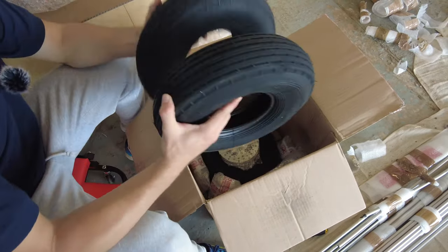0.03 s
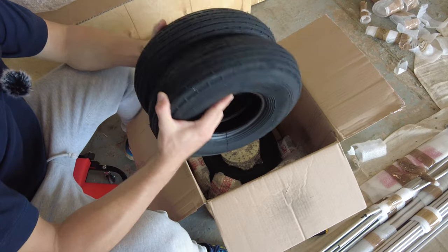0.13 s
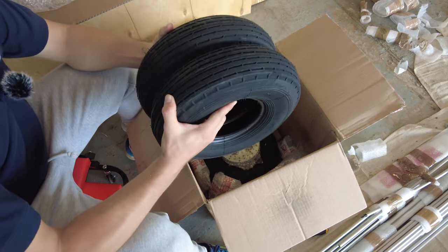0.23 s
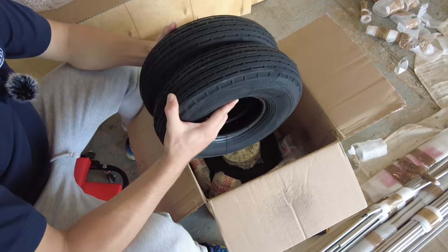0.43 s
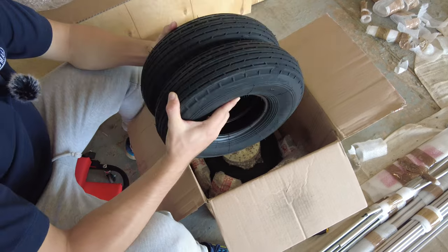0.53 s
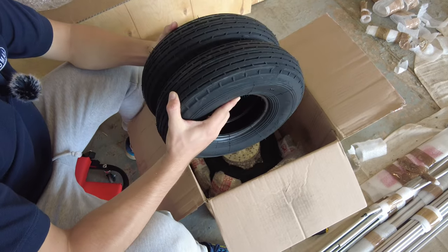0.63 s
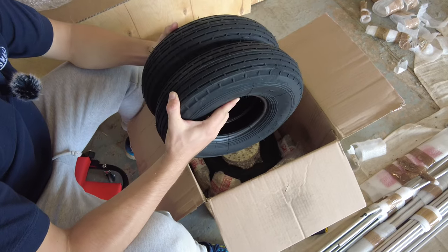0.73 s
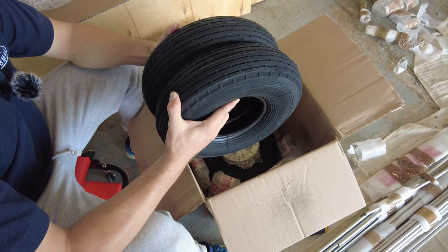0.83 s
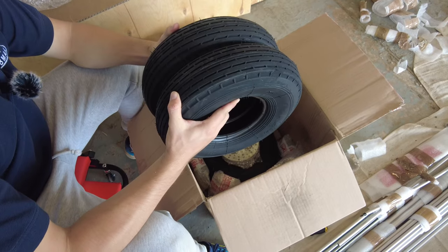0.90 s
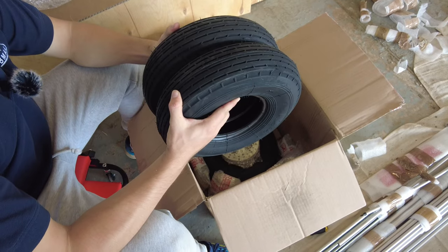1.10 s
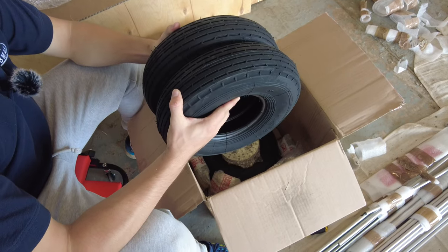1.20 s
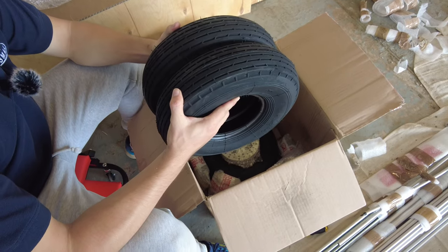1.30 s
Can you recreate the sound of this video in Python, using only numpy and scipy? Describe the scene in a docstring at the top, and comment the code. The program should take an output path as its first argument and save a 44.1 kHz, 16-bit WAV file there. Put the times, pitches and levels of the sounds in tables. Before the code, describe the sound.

One hollow thump of a tyre bumping a cardboard box, then faint ticks, indoors.

```python
"""A low hum and the hiss of air fill a small room. With a faint tick, a rubber tyre is lifted out of a
cardboard box. It grazes a flap, then scuffs and knocks the wall: the impact excites the modes of the
box and of the air in the tyre, a hollow thump. It nudges the box again. At each contact the card
crackles and the wall flexes, and the room rings briefly. A few faint ticks follow as the tyre is held."""
import sys
import numpy as np
from scipy import signal
from scipy.fft import rfft, irfft, next_fast_len
from scipy.io import wavfile
from scipy.ndimage import map_coordinates

SR = 44100
rng = np.random.default_rng(int(sys.argv[2]) if len(sys.argv) > 2 else 0)


def unload_audio(sound):
    """Save the sound as a 16-bit wav file, at the path given as the first command line argument."""
    columns = np.transpose(np.atleast_2d(sound))
    # keep every value between -1 and 1, then stretch to whole-number steps
    steps = np.round(np.clip(columns, -1, 1) * 32767)
    wavfile.write(sys.argv[1], SR, steps.astype(np.int16))


N = 59535

# Spectrum of the bright noise in ticks and slides. Each row: frequency in Hz, level in dB.
BRIGHT_SPECTRUM = [(500, -24), (1700, -7), (2700, 6), (4000, -5), (8000, -3), (11000, -6), (15000, -14.5)]


def amp(db):
    """Decibels to amplitude ratio."""
    return 10 ** (np.asarray(db) / 20)


def unit(x):
    """Normalise to rms 1."""
    return x / np.sqrt(np.mean(x ** 2) + 1e-20)


def along(points, hz):
    """Interpolate (Hz, value) points on a logarithmic frequency axis."""
    freqs, values = np.transpose(points)
    return np.interp(np.log(hz + 1), np.log(freqs + 1), values)


def filtered(x, response):
    """Linear filtering: multiply the spectrum by a frequency response."""
    size = next_fast_len(len(x) + SR // 2)
    return irfft(rfft(x, size) * response(np.fft.rfftfreq(size, 1 / SR)), size)[:len(x)]


def noise(spectrum):
    """White noise shaped to a (Hz, dB) spectrum, at rms 1."""
    return unit(filtered(rng.standard_normal(N), lambda hz: amp(along(spectrum, hz))))


def wobble(rate):
    """A smooth random curve with rate knots a second."""
    return map_coordinates(rng.standard_normal(int(N * rate / SR) + 4), [np.arange(N) * rate / SR])


def since(start):
    """Seconds since start, zero before it."""
    return np.maximum(np.arange(N) / SR - start, 0)


def fade(start, t60, attack):
    """A quick rise and an exponential decay of 60 dB in t60 seconds."""
    t = since(start)
    return (1 - np.exp(-t / attack)) * np.exp(-np.log(1000) * t / t60)


def ring(start, hz, t60, attack):
    """Free vibration of one struck mode: a damped sinusoid."""
    return np.sin(2 * np.pi * hz * since(start)) * fade(start, t60, attack)


def hum_and_air(hum_hz=78.6, waver_db=0.44):
    """Superposition: two harmonics of a hum trade strength over the broadband noise of the room's air."""
    # Each row: time in seconds, level of the fundamental in dB, level of the octave in dB.
    hum_levels = [(.1, -60, -75), (0.402, -66.5, -67), (.6, -65.5, -68.5), (1.3, -66, -67)]
    # Each row: frequency in Hz, relative spectral density in dB.
    air_spectrum = [(20, -0.5), (30, 6), (55, -5.5), (110, -15.5), (200, -22.5), (450, -28.5), (900, -26),
                    (1800, -35), (4000, -40), (8000, -44.5), (12000, -49), (14000, -60.5)]
    t = since(0)
    times, *harmonic_levels = np.transpose(hum_levels)
    out = amp(-62.5) * noise(air_spectrum)
    for harmonic, db in enumerate(harmonic_levels, 1):
        rms = amp(np.interp(t, times, db) + waver_db * wobble(5))
        out += np.sqrt(2) * rms * np.sin(2 * np.pi * (harmonic * hum_hz * t + rng.random()))
    return out


def ticks(t60=0.0081, lower_ratio=0.84):
    """Damped resonance: each small creak of card and rubber rings two modes under a bright snap."""
    # Each row: start in seconds, ring level in dB, resonance in Hz, snap level in dB, rise in seconds.
    creaks = [(.041, -50, 2700, -62.5, 0.0023), (.126, -52.5, 1308, -88.5, .001),
              (.391, -45.5, 2820, -64.5, 0.00082), (0.575, -82, 3880, -56, 0.00083),
              (.5797, -46.5, 2950, -51, 0.00019), (.776, -78.5, 2966, -67.5, 0.00047),
              (0.807, -59.5, 2560, -67, 0.00091), (0.954, -44, 1240, -88, 0.0012),
              (.973, -67, 4500, -65.5, 0.00058), (1.2463, -49.5, 2706, -59, 0.00046),
              (1.2575, -53.5, 2680, -61.5, 0.00033)]
    out = np.zeros(N)
    for start, db, hz, snap_db, rise in creaks:
        modes = ring(start, hz, t60, rise) - amp(-6) * ring(start, hz * lower_ratio, t60, rise)
        snap = noise(BRIGHT_SPECTRUM) * fade(start, t60=0.013, attack=rise)
        out += amp(db) * modes + amp(snap_db) * snap
    return out


def reverberation(x, build_s=0.0027):
    """Convolution with a diffuse tail: the room's reflections die at a rate set by frequency."""
    # Each row: frequency in Hz, reverberation time in seconds.
    decay_times = [(60, 0.57), (250, 0.86), (550, .65), (2700, 0.6), (6000, .42), (12000, 0.43)]
    # Each row: frequency in Hz, gain of the tail in dB.
    colour = [(40, -5.5), (90, 1), (170, -2.5), (270, -14), (420, -2.5), (600, -3.5), (900, -9),
              (1400, 5.5), (2700, -1), (5000, 0.5), (12000, 1.5)]
    hz, t, spectra = signal.stft(rng.standard_normal(SR), SR, nperseg=256)
    decay = np.exp(-np.log(1000) * t / along(decay_times, hz)[:, None])
    _, tail = signal.istft(spectra * decay, SR, nperseg=256)
    tail = filtered(tail / np.linalg.norm(tail), lambda f: amp(along(colour, f)))
    tail *= 1 - np.exp(-np.arange(len(tail)) / SR / build_s)
    return amp(-11.5) * signal.fftconvolve(x, tail)[:N]


def knocks(wall_hz=96, wall_lag_s=0.0021, pat_lag_s=0.0028, pat_width_s=0.00089):
    """Impacts excite the modes of the box and the tyre's air; rubber that stays in touch damps them."""
    # Each row: start in seconds, thump level in dB, softness cut-off in Hz, share of the free ring
    # time, crack level in dB, wall push in dB, pat level in dB.
    contacts = [(0.123, -56, 2370, 0.83, -72, -59.5, -43), (0.1805, -26.5, 901, 0.44, -31.5, -31, -20.5),
                (0.2076, -8, 1500, 0.89, -36.5, -24, -43.5), (0.314, -32.5, 290, 0.87, -82, -49, -48),
                (0.36, -29.5, 540, 0.78, -51, -35, -50.5), (0.386, -48, 505, 0.66, -72, -42.5, -82),
                (.452, -47, 316, 1, -80, -72, -77)]
    # Modes of the box and of the air inside the tyre.
    # Each row: frequency in Hz, relative level in dB, free 60 dB decay time in seconds.
    box_modes = [(200.9, -22, 0.02), (257.8, 0.5, .07), (314.4, -3, 0.086), (427, -12.5, .035),
                 (564.5, -19.5, .085), (657, -29, 0.044), (722, -5, 0.011), (782, -26.5, .05),
                 (970, -28, 0.01), (1299, -38, .09), (2304, -45.5, .06)]
    cavity_modes = [(262.7, -31.5, 0.6), (302.5, -39.5, .6), (391.8, -37, .3), (623, -36.5, 0.32)]
    # Each entry: the direction in which a box mode first swings.
    polarities = [1, 1, -1, 1, -1, -1, 1, 1, 1, -1, 1]
    # The cardboard's crack. Each row: frequency in Hz, level in dB.
    crack_spectrum = [(100, -18.5), (750, -14), (1050, -5.5), (1400, 5), (1850, -6), (2650, 5.5),
                      (3800, -13.5), (6500, -11.5), (9500, -19.5), (12000, -37), (15000, -42.5)]
    out = np.zeros(N)
    for start, db, soft_hz, free, crack_db, push_db, pat_db in contacts:
        # A softer contact drives high modes less and cracks with a slower rise.
        drive = lambda hz: amp(db) / np.sqrt(1 + (hz / soft_hz) ** 4)
        for sign, (hz, mode_db, t60) in zip(polarities, box_modes):
            out += sign * amp(mode_db) * drive(hz) * ring(start, hz, t60 * free, attack=0.00045)
        for hz, mode_db, t60 in cavity_modes:
            out += free * amp(mode_db) * drive(hz) * ring(start, hz, t60, attack=0.01)
        out += amp(crack_db) * noise(crack_spectrum) * fade(start, t60=0.011, attack=0.4 / soft_hz)
        # Rubber lands flat on the card: one rounded pulse of pressure.
        out += amp(pat_db) * np.exp(-((since(0) - start - pat_lag_s) / pat_width_s) ** 2)
        # The whole wall bulges.
        out += amp(push_db) * ring(start + wall_lag_s, wall_hz, t60=0.09 * free, attack=0.003)
    return out


def rubbing(grain_hz=903, rough_db=5, release_t60=0.019):
    """Friction noise: rubber slides softly on the card and catches in grainy bursts at the main knock."""
    # Each row: start in seconds, level in dB, hold in seconds.
    scuffs = [(0.2011, -35, 0.00034), (0.2033, -41, 0.00087), (0.2103, -41.5, 0.0089)]
    # Each row: frequency in Hz, level in dB.
    scuff_spectrum = [(200, -11), (750, 2), (1200, -8.5), (1800, -8), (2500, 1.5), (3200, -6), (3900, -12),
                      (6500, -18), (9500, -26), (15000, -46)]
    # The tyre's flank sliding. Each row: centre in seconds, level in dB, half-length in seconds.
    slides = [(0.152, -67.5, 0.0081), (0.371, -76.5, 0.03), (0.812, -72.5, .006), (0.867, -77, 0.0075)]
    grainy = lambda spectrum: unit(noise(spectrum) * amp(rough_db * wobble(grain_hz)))
    out = np.zeros(N)
    for start, db, hold in scuffs:
        envelope = (since(start) > 0) * np.exp(-np.log(1000) * since(start + hold) / release_t60)
        out += amp(db) * grainy(scuff_spectrum) * envelope
    for centre, db, half_length in slides:
        swell = np.exp(-((since(0) - centre) / half_length) ** 2)
        out += amp(db) * grainy(BRIGHT_SPECTRUM) * swell
    return out


def scene(card_top_hz=11600):
    """Direct and reverberant sound add over the hum; the soft card radiates little top treble."""
    box = filtered(knocks() + rubbing(), lambda hz: 1 / np.sqrt(1 + (hz / card_top_hz) ** 8))
    close_ticks = ticks()
    room = reverberation(box + amp(-4) * close_ticks)  # a close source sounds drier
    return (box + close_ticks + room + hum_and_air())[None]


def record(dry, low_hz=29.98, top_hz=15800):
    """Band limiting: the microphone thins the lowest bass and the recorder cuts off the top treble."""
    passband = lambda hz: 1j * hz / (low_hz + 1j * hz) * (hz < top_hz)
    return np.array([filtered(x, passband) for x in dry])


dry = scene()
out = record(dry)
unload_audio(out)
```